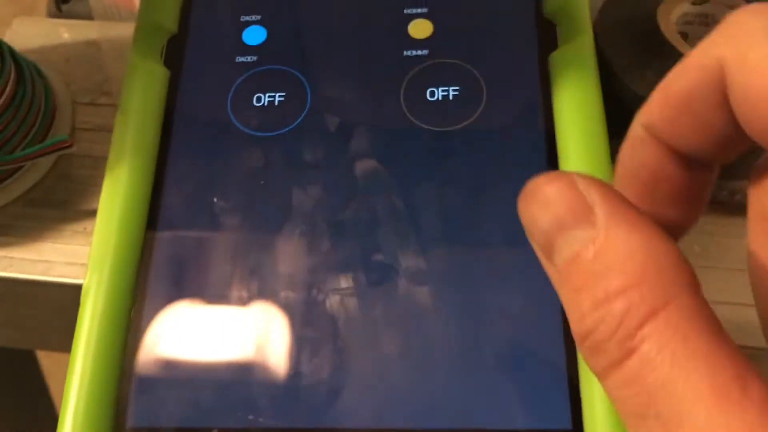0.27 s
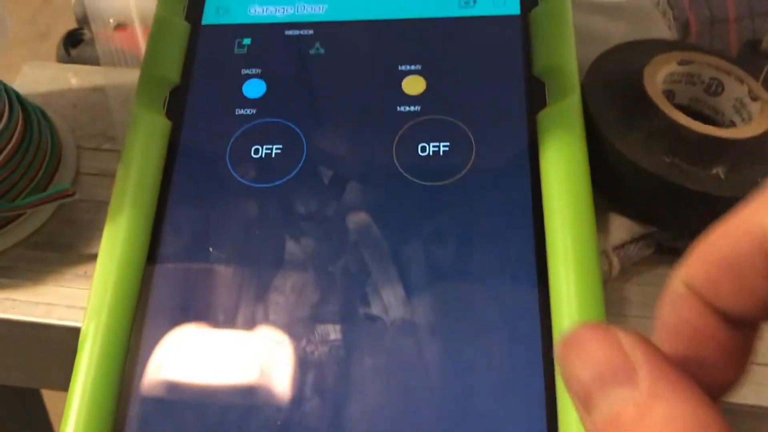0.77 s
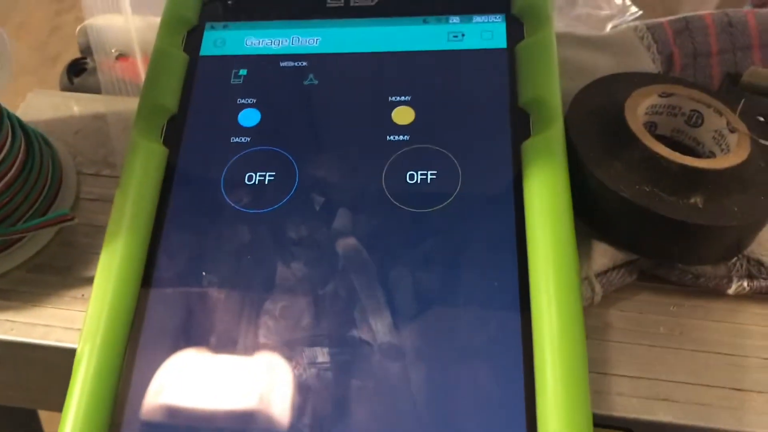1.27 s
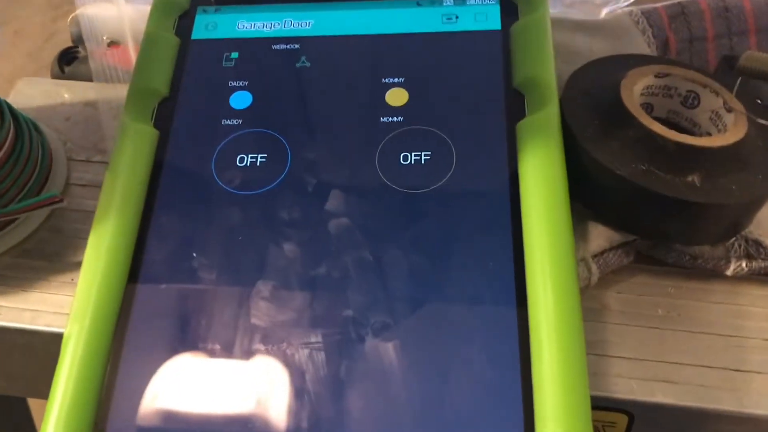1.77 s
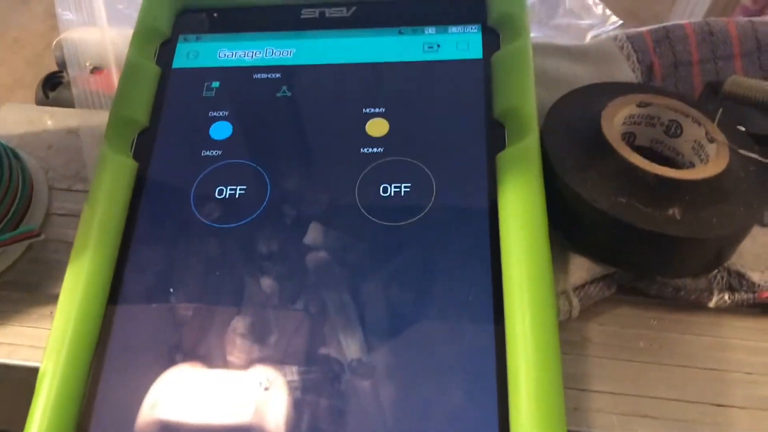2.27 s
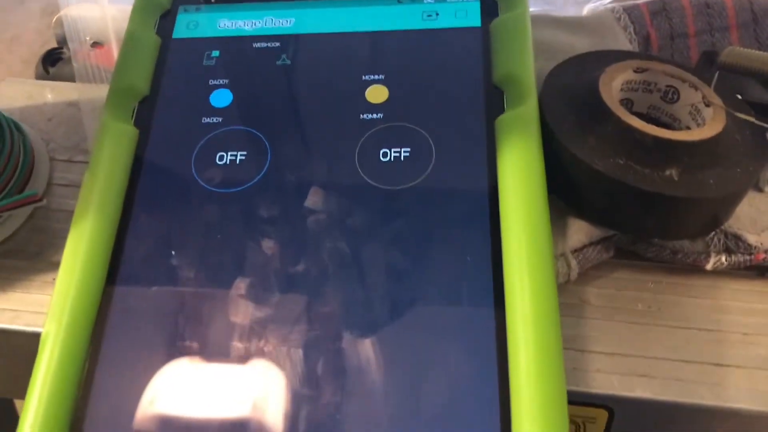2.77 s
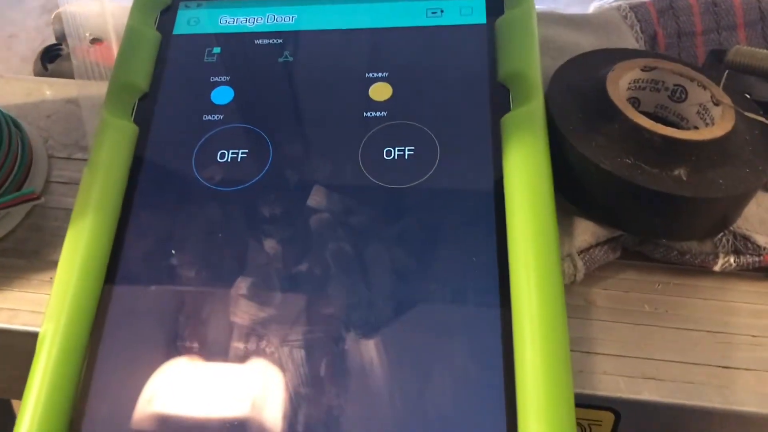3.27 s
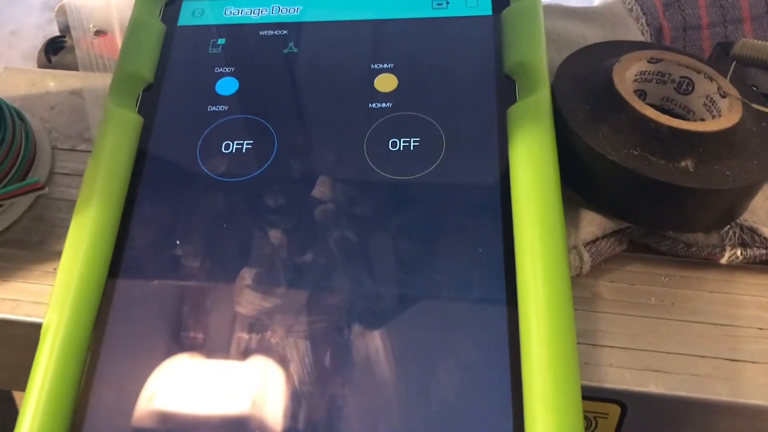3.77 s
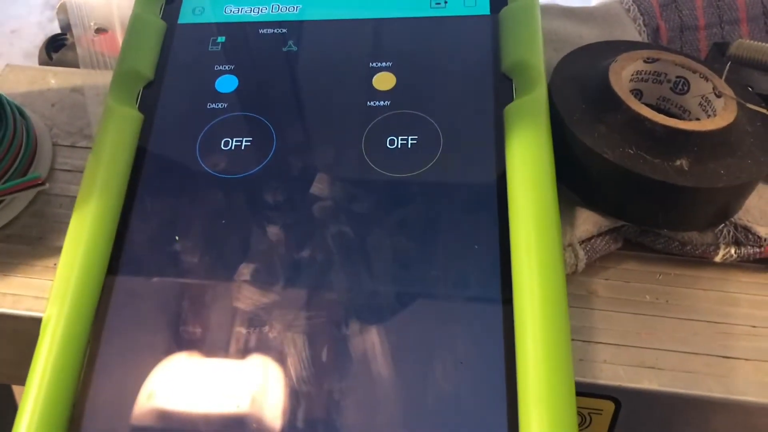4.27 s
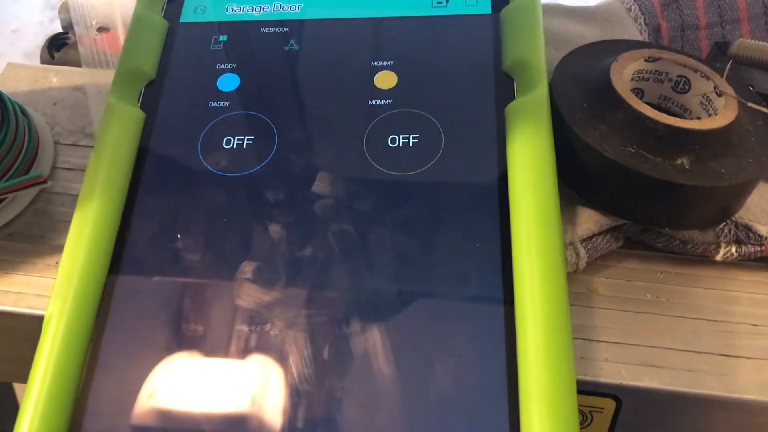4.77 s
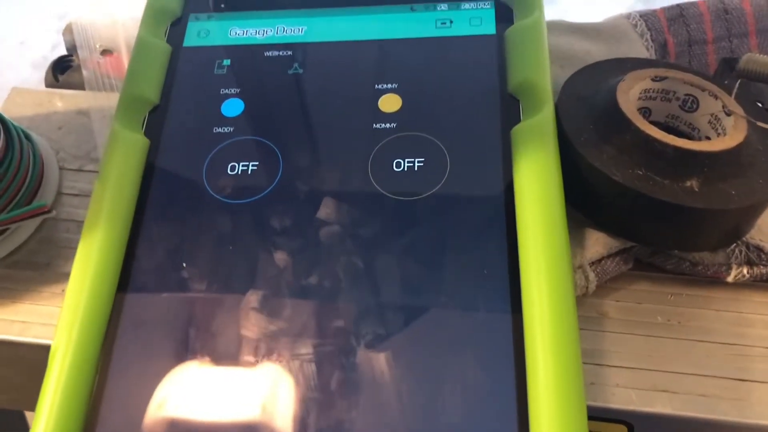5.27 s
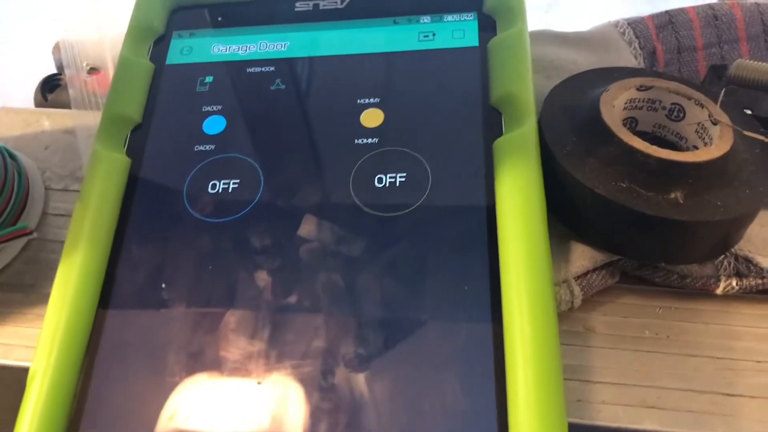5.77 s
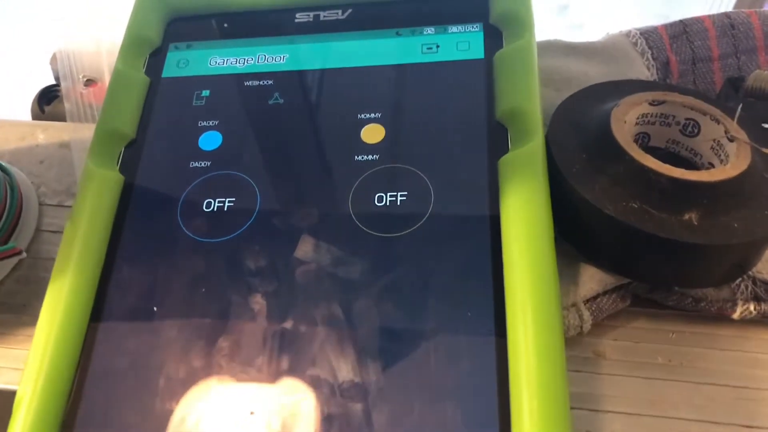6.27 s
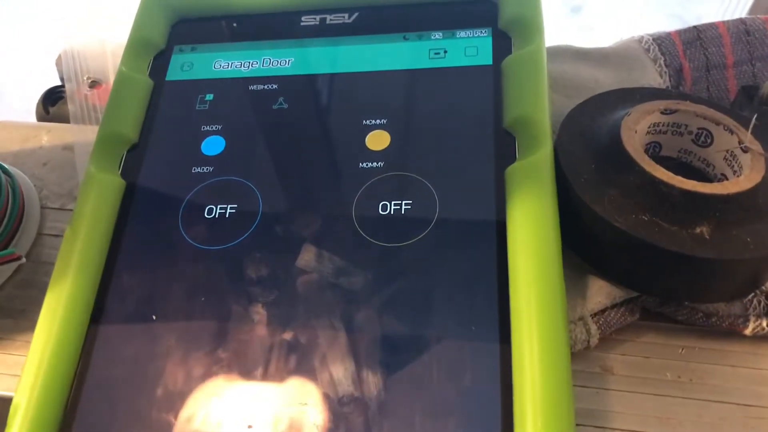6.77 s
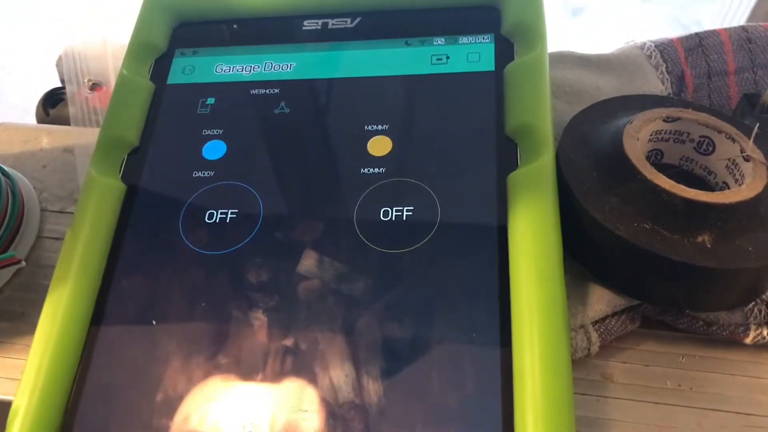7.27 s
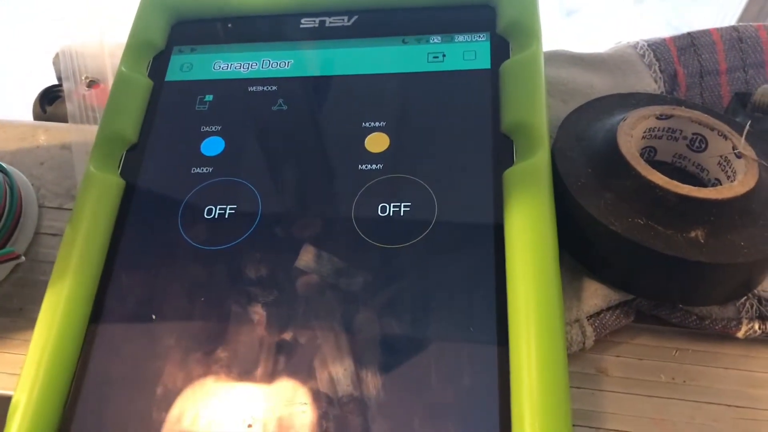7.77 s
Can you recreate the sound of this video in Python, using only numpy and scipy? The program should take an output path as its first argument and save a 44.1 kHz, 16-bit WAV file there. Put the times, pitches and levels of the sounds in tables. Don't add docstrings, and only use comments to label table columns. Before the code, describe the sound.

Steady low electric hum of a running garage door opener, with fast chain clicking, rolling track noise and scattered metallic knocks in a garage.

```python
import sys
import numpy as np
from scipy import signal
from scipy.io import wavfile
from scipy.ndimage import uniform_filter1d

SR = 44100
rng = np.random.default_rng(int(sys.argv[2]) if len(sys.argv) > 2 else 0)


def voltage_ratio(level):
    return 10 ** (np.asarray(level, float) / 20)


def waveform_to_disk(signal):
    frames = np.transpose(np.atleast_2d(signal))
    scaled = np.clip(frames, -1, 1) * 32767
    samples = np.round(scaled).astype(np.int16)
    wavfile.write(sys.argv[1], SR, samples)


N = 353241
T = np.arange(N) / SR
PULL_HZ = 119.957

# time in seconds, beats of shaft order four
# against the pull, level of that order in dB.
ROTOR_LAG = [(-.15, 0, -55), (.3, 1.55, -52), (1.03, 4, -41), (1.615, 6, -51), (1.914, 7, -44),
             (2.844, 10, -52), (3.771, 13, -49), (4.32, 15, -52), (4.909, 17, -47), (5.483, 19, -53),
             (5.834, 20, -63), (6.147, 21, -38), (6.426, 22, -55), (6.925, 24, -43), (7.74, 27, -45),
             (8.25, 29, -55)]
# time in seconds, drag in the track in dB, load on the bearings in dB.
ROLLER_DRAG = [(0, -43, -42), (.2, -44.5, -53), (.45, -44, -47.5), (.7, -43.5, -56), (1.05, -46.5, -49),
               (1.4, -46.5, -45), (1.9, -46, -53), (2.4, -47, -46.5), (3.06, -43.5, -50), (3.7, -46.5, -55),
               (4.6, -47, -56), (5.05, -46.5, -56), (5.5, -47, -57), (6.45, -47.5, -57), (6.58, -45, -54),
               (6.75, -46, -54), (7.75, -44.5, -58), (8.01, -44, -38)]


def motor():
    # time in seconds, hum level in dB.
    hum = [(0, -26), (0.03, -24), (0.07, -30.3), (0.12, -25), (0.2, -26.5), (0.35, -24.5), (0.6, -24.5),
           (1, -24), (1.5, -24), (2, -24), (3, -23.5), (4, -23.8), (5, -24.2), (6, -24), (7, -24),
           (7.5, -23.3), (8.01, -24.5)]
    pull_multiples = [0, 0, 0, 0, 0, 0, 0, 0, 0, 1, 1, 1, 1, 2, 3, 4, 6]
    shaft_orders = [1, 2, 5, 7, 9, 11, 14, 15, 18, -1, 4, 5, 9, 0, 0, 0, 0]
    # line level in dB (orders 2 and 7: relative to the frame shake), wavering in dB.
    motor_lines = [(-66, 1), (-1.5, 1.2), (-51.5, 1.2), (-2, 1.5), (-47.5, 2), (-59, 2), (-63, 2), (-65, 2),
                   (-66, 2), (-53, 1.5), (-53, 2), (-58, 2), (-63, 2), (-46.1, 1), (-50.5, 1), (-69, 1.5),
                   (-67, 1)]
    pull = 2 * np.pi * PULL_HZ * T
    shaft = 2 * np.pi * shaft_turns()
    out = voltage_ratio(curve(hum, axis=1)) * np.cos(pull)
    out += voltage_ratio(curve(ROTOR_LAG, axis=2)) * np.cos(4 * shaft)
    second_db, seventh_db, rumble_db = shakes()
    shake_db = {2: second_db + 1.7 * wander(3.0), 7: seventh_db}
    for multiple, order, (db, waver_db) in zip(pull_multiples, shaft_orders, motor_lines):
        load_db = shake_db.get(order, 1.3 * rumble_db * (multiple == 0))
        start = 2 * np.pi * rng.random() if order else np.pi * (multiple - 1)
        angle = multiple * pull + order * shaft + start + 0.13 * waver_db * wander(3.5)
        out += voltage_ratio(db + load_db + waver_db * wander(4.1)) * np.cos(angle)
    return np.sqrt(2) * out


def shaft_turns():
    lag = uniform_filter1d(curve(ROTOR_LAG, axis=1), size=6000)
    return (PULL_HZ * T - lag) / 4


def shakes():
    # time in seconds, how much the frame shakes with the shaft in dB.
    frame_shake = [(0, -50), (.35, -45), (.85, -40), (1.5, -53), (2.3, -50), (2.8, -50), (3.3, -52),
                   (3.8, -58), (4.6, -56), (5, -53), (6, -48), (6.7, -47), (7, -48), (7.6, -53), (7.8, -46),
                   (8.01, -45)]
    shake = curve(frame_shake, axis=1)
    sway = shake - shake.mean()
    jolt = jolts()
    jolt_swing = jolt - jolt.mean()
    second_db = shake + 0.13 * jolt_swing
    seventh_db = -49 + 0.17 * sway + jolt
    rumble_db = 0.27 * sway + 0.1 * jolt_swing
    return second_db, seventh_db, rumble_db


def jolts():
    # time in seconds, lift above the steady shake in dB.
    shake_jolts = [(0, 4), (.27, 10), (.43, 13), (.52, 11), (.7, 15.5), (.95, 2), (1.09, 16), (1.37, 18),
                   (1.5, 17), (1.76, 18.5), (2.05, 12), (2.35, 12), (2.74, 11), (2.88, 8), (3.3, 8.5),
                   (3.55, 1), (3.75, 5), (4.7, 4), (5.42, -5), (5.7, 5), (6.2, 12), (6.4, 9.5), (6.8, 13),
                   (7.02, 10), (7.35, 9), (7.79, 7), (7.92, 5)]
    width_s = 0.062
    return np.max([db * np.exp(-((T - s) / width_s) ** 2) for s, db in shake_jolts], axis=0)


def chain():
    # frequency in Hz, width in Hz, level in dB.
    link_modes = [(3000, 900, -22), (4000, 700, -20), (6200, 800, -3), (6850, 650, -1), (7600, 800, -4),
                  (8540, 800, -3)]
    # frequency in Hz, width in Hz, level in dB.
    link_top_modes = [(9800, 1000, -2), (11000, 800, 0), (11900, 900, -3), (13400, 1500, -10),
                      (14900, 1300, -14)]
    spread = 1.3
    tilt_db = 2.5
    lowest_top_hz = link_top_modes[0][0]
    rows = [(s - .001, db - .6, bright_db + 10.0, .024) for s, db, bright_db in ticks()]
    lower = [(f, w * spread, db) for f, w, db in link_modes]
    upper = [(f, w * spread, db + tilt_db * np.log2(f / lowest_top_hz)) for f, w, db in link_top_modes]
    return strikes(rows, lower, upper, scatter_db=1.5, rise=.0035, snap=6., size=1500)


def ticks():
    # time in seconds, peak in dB, brightness in dB.
    slack = [(0, -34, -18), (.55, -38.5, -19), (.88, -48, -10), (1.4, -32.5, -19), (1.8, -44, -11),
             (2, -44, -31), (2.55, -33.5, -19), (3.1, -41, -14), (3.5, -36.5, -17), (3.7, -47, -18),
             (3.9, -29.5, -16), (4.1, -41, -12), (4.7, -36, -16), (5.15, -44, -17), (5.9, -37, -16),
             (6.7, -34, -17.5), (7.03, -44, -19), (7.45, -36, -10.5)]
    # time in seconds, peak in dB, brightness in dB.
    loud_ticks = [(0.044, -33, -14), (0.641, -31.5, -11.5), (0.713, -31.5, -10.5), (1.054, -25.5, -19),
                  (1.121, -28.5, -14), (1.189, -27.5, -22), (1.2575, -24.5, -15), (1.3285, -30.5, -16),
                  (1.872, -29, -18), (2.353, -33, -18), (2.421, -28.5, -21), (2.4946, -31, -15),
                  (2.838, -40, -5), (2.9063, -34, -9), (2.974, -25.5, -12), (3.145, -41, -6), (3.793, -33, -14),
                  (3.931, -35, -10), (4.413, -29, -22), (5.579, -34.5, -12), (5.711, -31, -26),
                  (5.9877, -33, -14), (6.126, -30, -19), (6.337, -39, -4), (6.402, -31, -16),
                  (6.7466, -30.5, -13), (6.813, -29, -14), (6.885, -28.5, -19), (7.296, -33, -12),
                  (7.647, -31.5, -7.5)]
    count, seat_phase, jitter_s = 116, .27, 0.0016
    level_scatter_db, bright_scatter_db = 1.5, 2.5
    luck = rng.standard_normal((count, 5)).T
    s = np.interp(np.arange(count) + seat_phase, shaft_turns() / 2, T) + jitter_s * luck[0]
    at, peak_db, bright_db = np.transpose(slack)
    db = np.interp(s, at, peak_db)
    bright = np.interp(s, at, bright_db)
    seats = np.c_[s, db + level_scatter_db * luck[1], bright + bright_scatter_db * luck[2]]
    trails = np.c_[s + 0.025, db - 1.5 - 1.5 * luck[3], bright + bright_scatter_db * luck[4]]
    plain = np.r_[seats, trails[luck[3] > .4]]
    near_loud = abs(plain[:, :1] - np.transpose(loud_ticks)[0]).min(axis=1) < .012
    plain[:, 1] -= 60 * near_loud
    return np.r_[plain, loud_ticks]


def panels():
    # frequency in Hz, density in dB per Hz.
    rumble_spectrum = [(20, -33), (40, -26), (60, -8), (80, -15), (100, -9.5), (150, -11), (175, -8.5),
                       (187, -10.5), (207, -8.5), (222, -7), (265, -8), (350, -8), (368, -15), (700, -29)]
    low = noise(rumble_spectrum, size=8192, patchy_db=1.1, flicker_db=.3)
    deep = signal.sosfilt(signal.butter(4, 82, fs=SR, output="sos"), low)
    body = signal.sosfilt(signal.butter(4, 82, "high", fs=SR, output="sos"), low)
    second_db, seventh_db, rumble_db = shakes()
    mode = resonate(rng.standard_normal(N), hz=209.0, width=14.5)
    out = voltage_ratio(0.61 * second_db - 21.5) * evened(deep)
    out += voltage_ratio(rumble_db + 1.5 * wander(7.9) - 39.5) * evened(body)
    return out + voltage_ratio(seventh_db - 13.0) * evened(mode)


def rollers():
    # frequency in Hz, density in dB per Hz.
    roar_spectrum = [(240, -42), (400, -5), (576, -11.5), (666, -6), (794, -9), (1120, -8), (1220, -8),
                     (1470, -8.5), (1840, -12), (2050, -10.5), (3200, -14), (3510, -18.5), (4460, -19),
                     (4800, -20.5), (6240, -41), (10600, -120)]
    # frequency in Hz, width in Hz, level in dB.
    track_modes = [(334, 8, -56), (405, 10, -62), (435, 10, -62), (526, 10, -63), (555, 8, -66),
                   (655, 6, -65), (687, 4, -65), (844, 20, -65), (961, 15, -66), (1197, 30, -62),
                   (1323, 20, -65)]
    drag_db = curve(ROLLER_DRAG, axis=1)
    roar = noise(roar_spectrum, size=1024, patchy_db=1.0, flicker_db=1.63)
    rings = grit_rings(track_modes)
    return voltage_ratio(drag_db + 1.11) * roar + voltage_ratio(drag_db - drag_db.mean()) * rings


def bearings():
    # frequency in Hz, width in Hz, level in dB.
    whirr_modes = [(2020, 110, 0), (2260, 200, -1), (2650, 450, -4), (3200, 250, -8)]
    return voltage_ratio(curve(ROLLER_DRAG, axis=2) - 3.5) * evened(grit_rings(whirr_modes))


def chain_hiss():
    # frequency in Hz, density in dB per Hz.
    hiss_spectrum = [(2060, -21), (3500, -5.5), (4510, -5), (4970, -10), (5220, -2), (5860, -4.5),
                     (6610, -2), (7230, -7), (8360, -8), (10500, -12.5), (11300, -14), (14500, -18),
                     (16000, -20)]
    drag_db, load_db = curve(ROLLER_DRAG, axis=1), curve(ROLLER_DRAG, axis=2)
    hiss_db = -52 + 0.78 * (drag_db - drag_db.mean()) + 0.24 * (load_db - load_db.mean())
    return voltage_ratio(hiss_db + 0.43) * noise(hiss_spectrum, size=256, patchy_db=1.9, flicker_db=2.5)


def hinges():
    # start in seconds, peak in dB, upper share in dB, t60 in seconds.
    hinge_clanks = [(0.0505, -29.5, -3, 0.27), (0.2832, -43, 13, 0.38), (0.3287, -39, 9, 0.3),
                    (0.387, -34, 0.5, 0.3), (0.9308, -35.5, 5, 0.4), (1.7213, -49, 17, 0.29),
                    (2.426, -47, 15, 0.45), (3.2732, -29, -8, 0.22), (5.031, -26.5, -7, 0.29),
                    (5.0788, -42, -5, 0.5), (5.385, -29, -38, 0.2), (5.5992, -33, -26, 0.4),
                    (5.718, -35, -21, 0.31), (5.8117, -29.5, -23, 0.51), (6.028, -32, -14, 0.26),
                    (6.2476, -31, -17, 0.21), (6.5761, -23, -1, 0.14), (6.6094, -40, 8, 0.4),
                    (6.639, -32, -3, 0.26), (7.7673, -27.5, -3, 0.27), (7.9627, -66, 14, 0.4)]
    # start in seconds, peak in dB, upper share in dB, t60 in seconds.
    pin_scrapes = [
        (.481, -44, 6, .03),
        (6.577, -41, -3, .3),
        (6.88, -43, -12, .6),
        (7.92, -43, -3, .3),
    ]
    # frequency in Hz, width in Hz, level in dB.
    hinge_modes = [(1380, 190, 0), (1530, 170, -2)]
    hinge_top_modes = [(2250, 190, 0), (2460, 200, -1)]
    pin_modes = [(4550, 400, 0)]
    pin_top_modes = [(4900, 300, -2), (5200, 350, 0)]
    spread = 2.1
    lower = [(f, w * spread, db) for f, w, db in hinge_modes]
    upper = [(f, w * spread, db) for f, w, db in hinge_top_modes]
    clanks = strikes(hinge_clanks, lower, upper, scatter_db=1, rise=.003, snap=14., size=12000)
    scrapes = strikes(pin_scrapes, pin_modes, pin_top_modes, scatter_db=3, rise=.006, snap=0, size=12000)
    return voltage_ratio(-8.0) * clanks + scrapes


def garage(x):
    # frequency in Hz, t60 in seconds.
    room_decay = [(500, 0.34), (2000, 0.36), (8000, 1), (15000, 0.15)]
    taps = np.zeros(SR // 2)
    at = np.arange(200, len(taps) - 20, 20)
    taps[at + rng.integers(0, 20, len(at))] = rng.choice([-1., 1.], len(at))
    hz, t, z = signal.stft(taps, SR, nperseg=256)
    decay = voltage_ratio(-60 * t / read(room_decay, hz)[:, None])
    tail = signal.istft(z * decay, SR, nperseg=256)[1]
    return signal.fftconvolve(x, tail / np.linalg.norm(tail))[:N]


def strikes(rows, lower, upper, scatter_db, rise, snap, size):
    t = np.arange(size) / SR
    out = np.zeros(N + size)
    for s, db, upper_db, t60 in rows:
        swell_and_decay = np.where(t < rise, (t / rise) ** 2, voltage_ratio(-60 * (t - rise) / t60))
        rattle = rng.standard_normal(size) * swell_and_decay
        rattle[round(rise * SR)] += snap * rng.random()
        both = ring(rattle, lower, scatter_db) + voltage_ratio(upper_db) * ring(rattle, upper, scatter_db)
        out[round(s * SR):][:size] += voltage_ratio(db) * both
    return out[:N]


def ring(rattle, modes, scatter_db):
    luck = scatter_db * rng.standard_normal(len(modes))
    sign = (-1) ** np.arange(len(modes))
    out = sum(e * voltage_ratio(g + u) * resonate(rattle, f, w) for (f, w, g), u, e in zip(modes, luck, sign))
    return out / abs(out).max()


def grit_rings(modes):
    grit = rng.standard_normal(N)
    return sum(voltage_ratio(db) * evened(resonate(grit, f, w)) for f, w, db in modes)


def resonate(x, hz, width):
    b, a = signal.iirpeak(hz, hz / width, SR)
    return signal.lfilter(b, a, signal.lfilter(b, a, x))


def noise(spectrum, size, patchy_db, flicker_db):
    frames, hz = 4 * N // size + 5, np.fft.rfftfreq(size, 1 / SR)
    a, b, patches = rng.standard_normal((frames, len(hz), 3)).T
    patches = evened(uniform_filter1d(uniform_filter1d(patches, size=8, axis=0), size=8, axis=1))
    inside = (hz > spectrum[0][0]) & (hz < spectrum[-1][0])
    flicker = flicker_db * rng.standard_normal(frames)
    z = (a + 1j * b) * voltage_ratio(read(spectrum, hz)[:, None] + patchy_db * patches + flicker)
    return evened(signal.istft(z * inside[:, None], nperseg=size, noverlap=3 * size // 4)[1][:N])


def wander(top_hz):
    steps = rng.standard_normal(int(N / SR * 40) + 3)
    smooth = signal.filtfilt(*signal.butter(2, min(top_hz / 20, .9)), steps)
    return np.interp(T * 40, np.arange(len(steps)), evened(smooth))


def curve(rows, axis):
    columns = np.transpose(rows)
    return np.interp(T, columns[0], columns[axis])


def read(points, hz):
    f, value = np.transpose(points)
    return np.interp(np.log(hz + 1), np.log(f + 1), value)


def evened(x):
    return x / np.sqrt(np.mean(x ** 2) + 1e-20)


def scene():
    links, clanks = chain(), hinges()
    drive = motor() + panels() + rollers() + bearings() + chain_hiss()
    room = garage(voltage_ratio(-12) * links + voltage_ratio(-10.0) * clanks)
    return (drive + links + clanks + room)[None]


def low_pass(x):
    return signal.sosfilt(signal.butter(12, 15890, fs=SR, output="sos"), x)


def record(dry):
    lowpass = signal.firwin(801, 15890, window=("kaiser", 9), fs=SR)
    limited = signal.oaconvolve(dry, lowpass[None], "same")
    return low_pass(limited)


dry = scene()
out = record(dry)
waveform_to_disk(out)
```